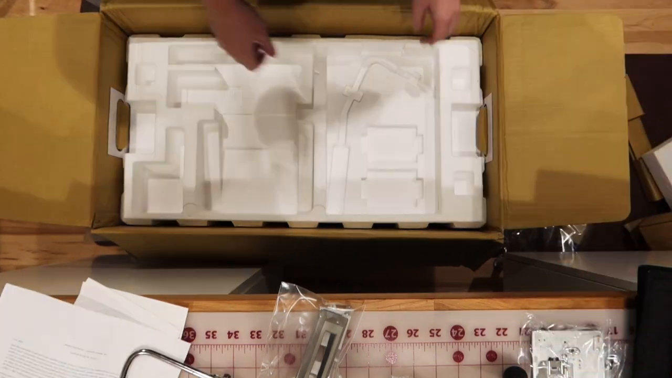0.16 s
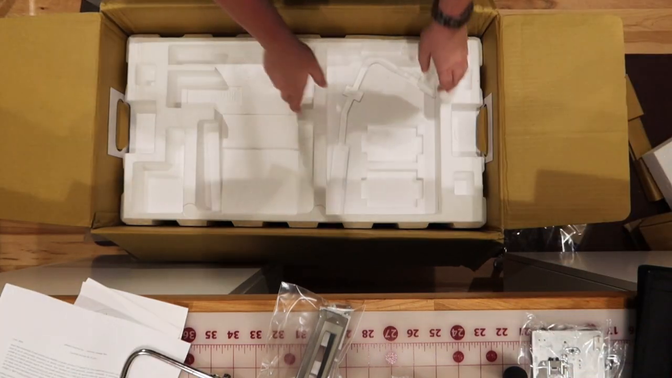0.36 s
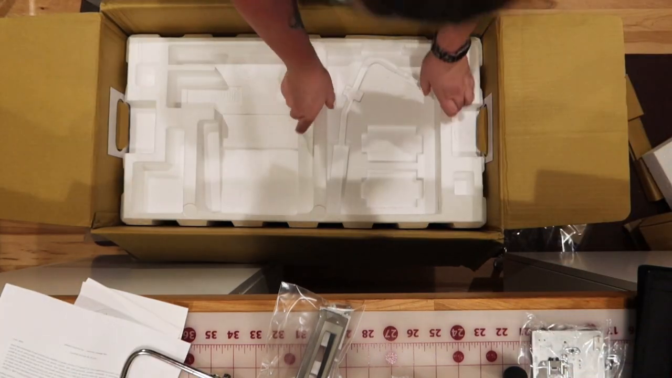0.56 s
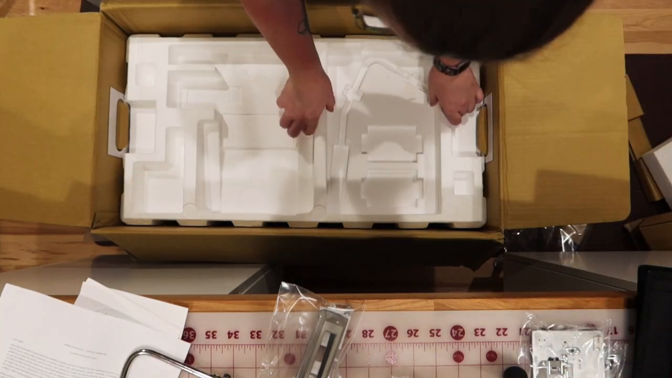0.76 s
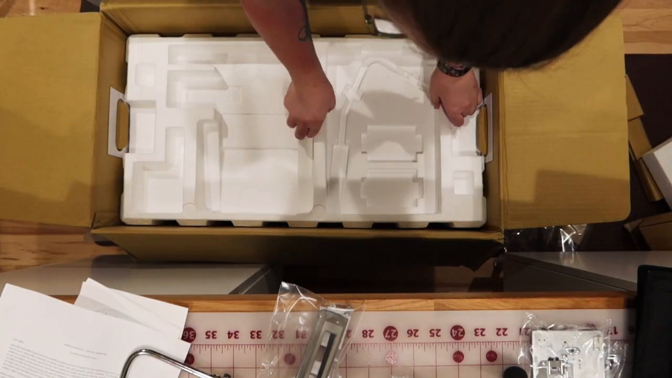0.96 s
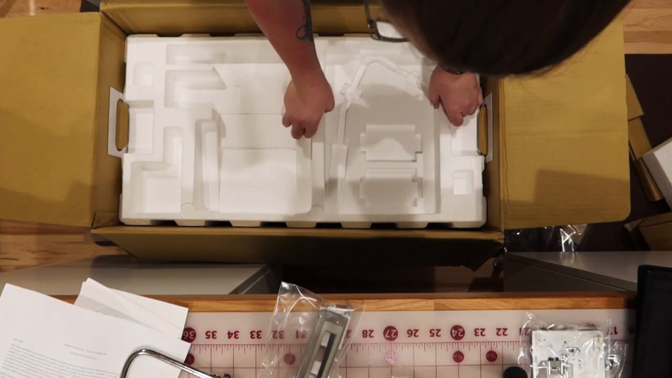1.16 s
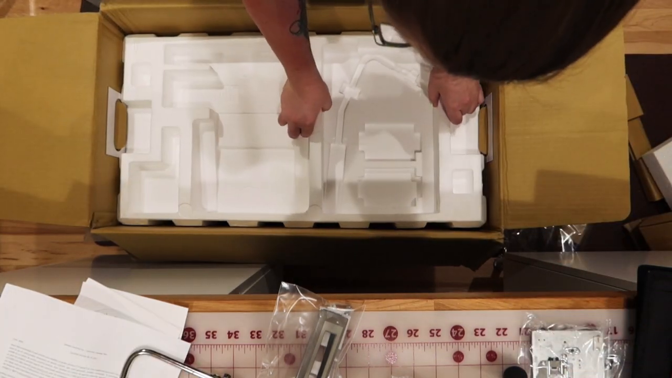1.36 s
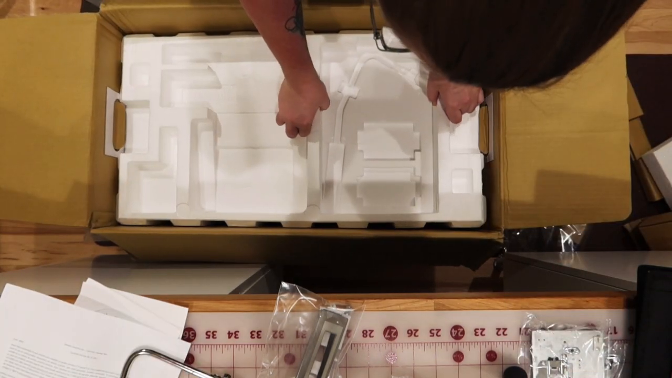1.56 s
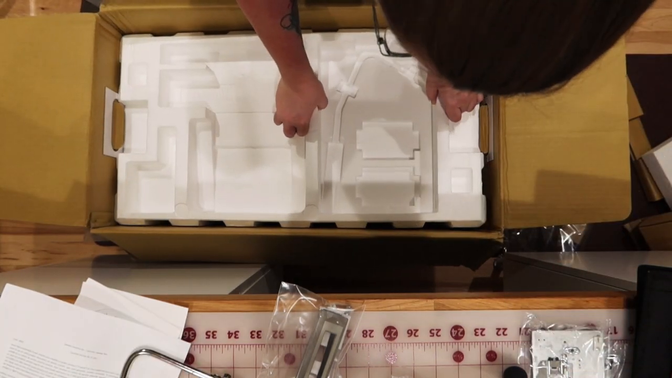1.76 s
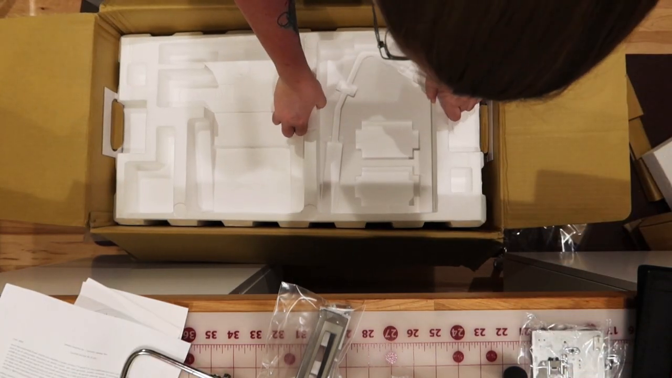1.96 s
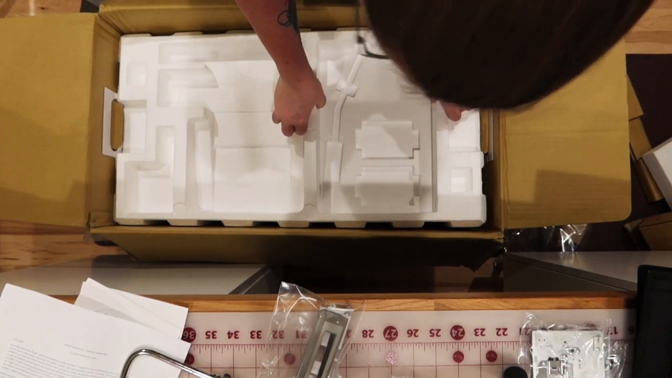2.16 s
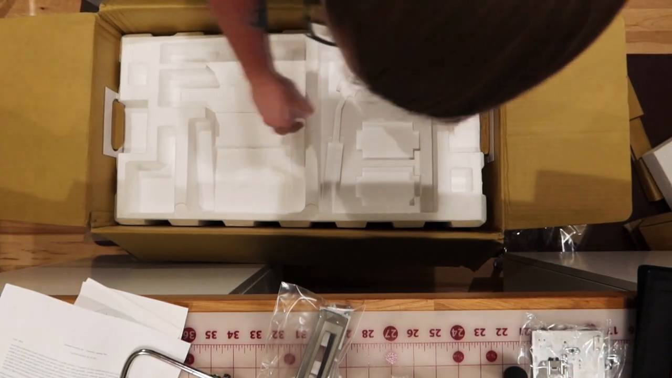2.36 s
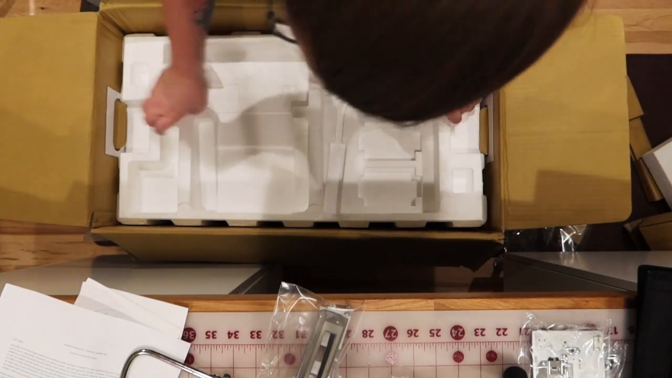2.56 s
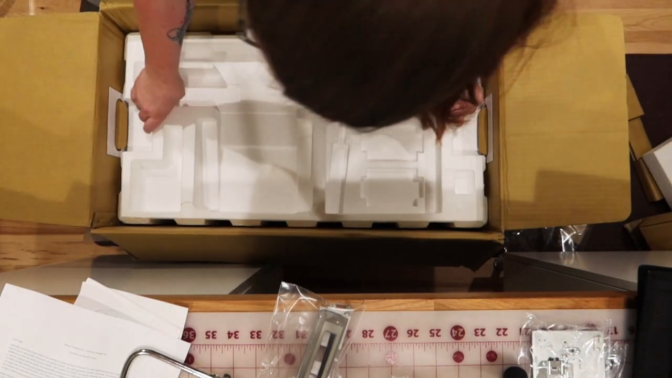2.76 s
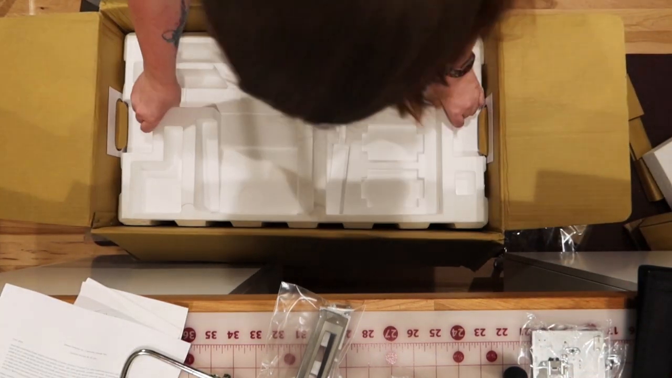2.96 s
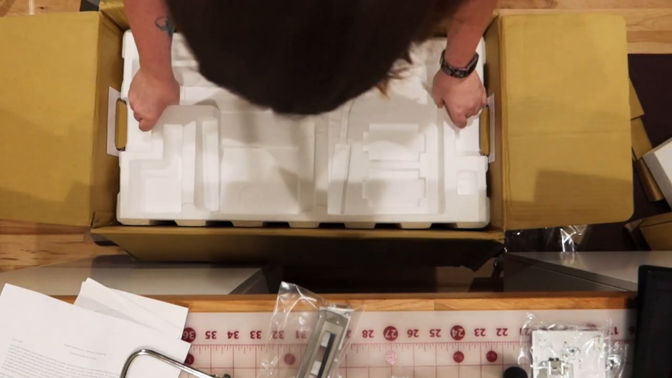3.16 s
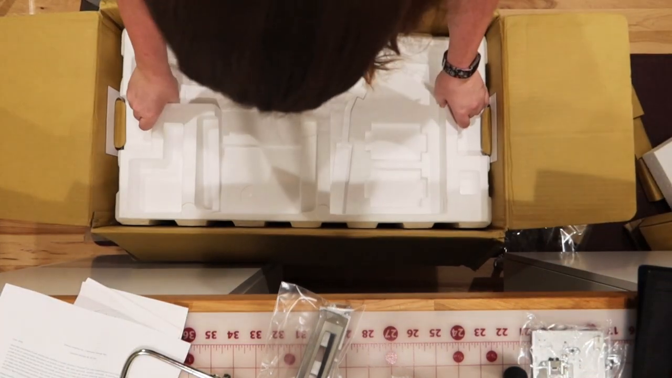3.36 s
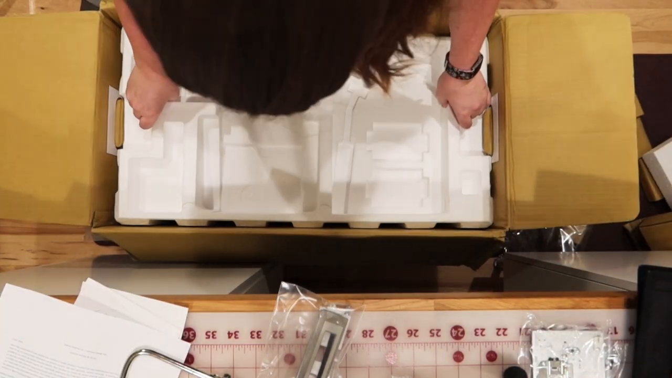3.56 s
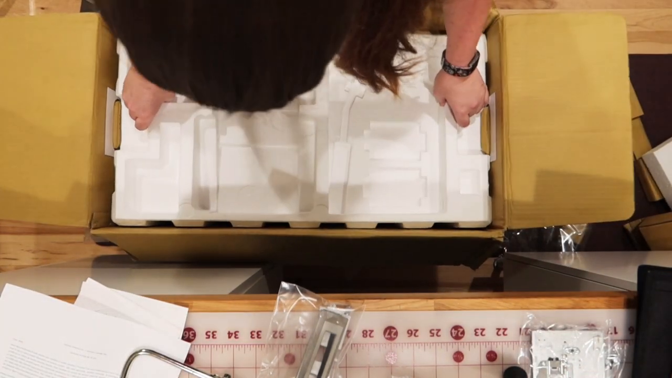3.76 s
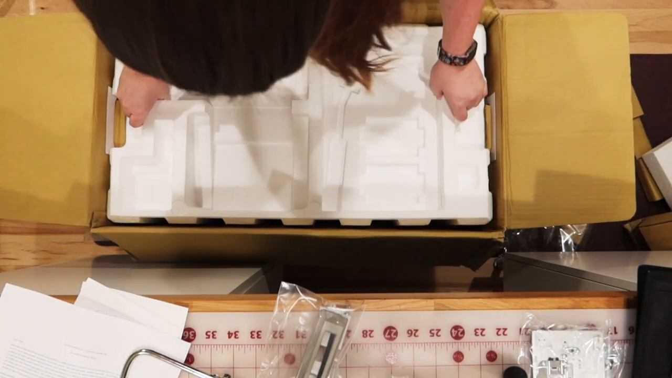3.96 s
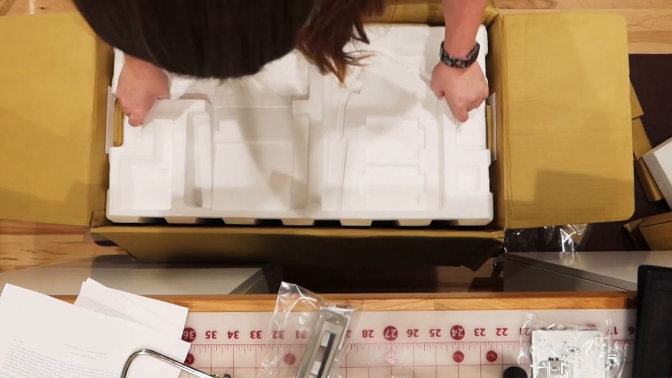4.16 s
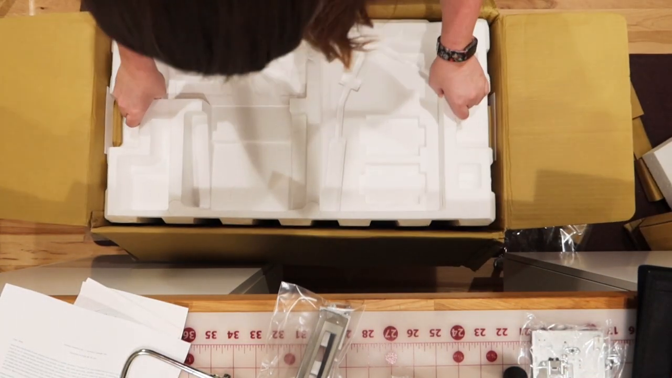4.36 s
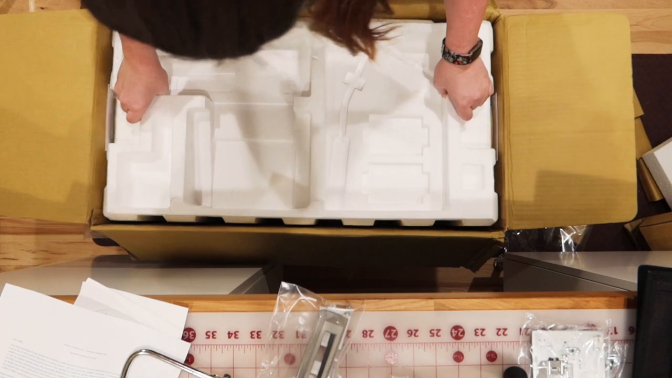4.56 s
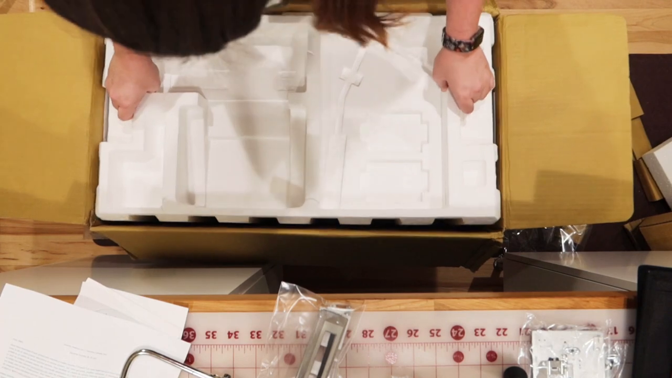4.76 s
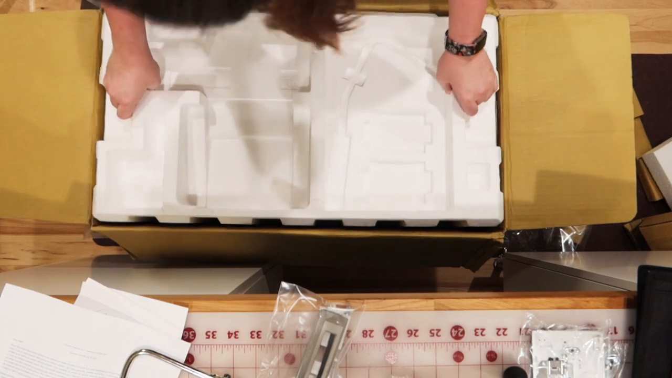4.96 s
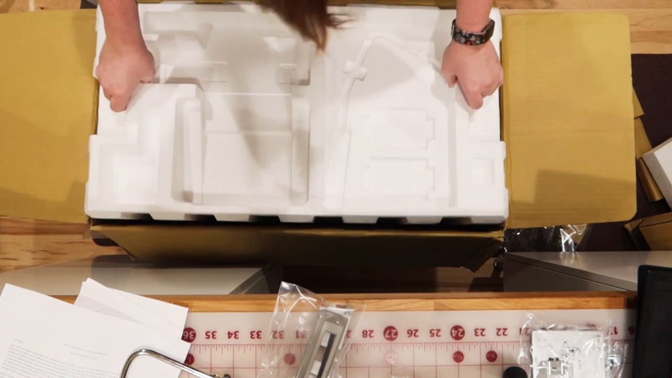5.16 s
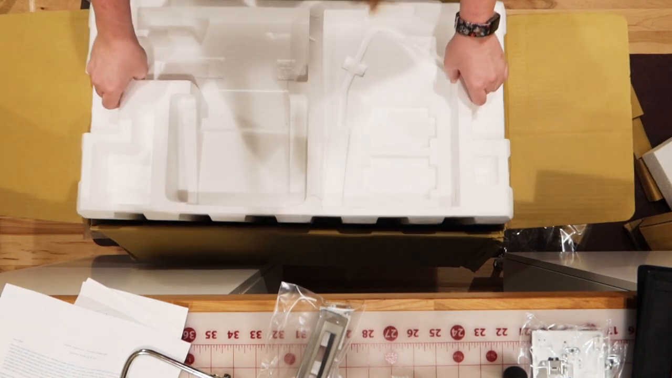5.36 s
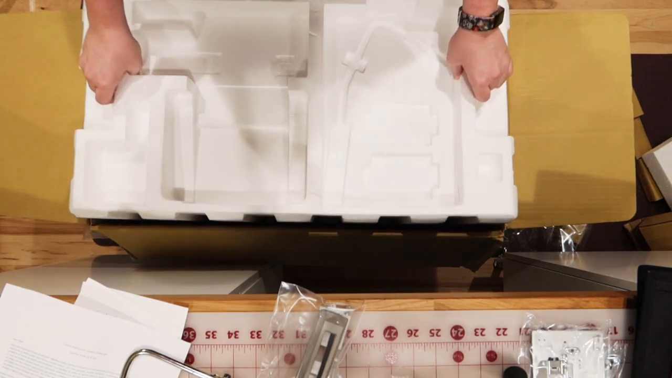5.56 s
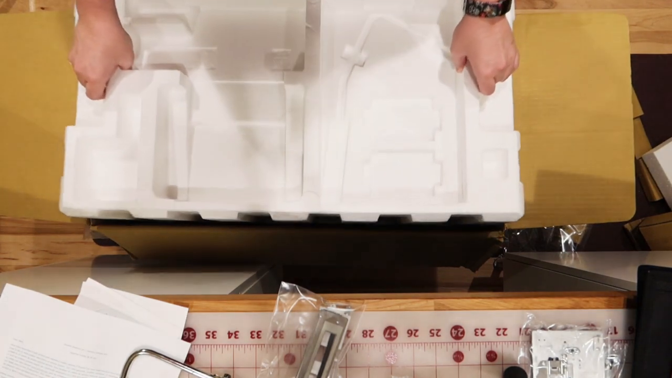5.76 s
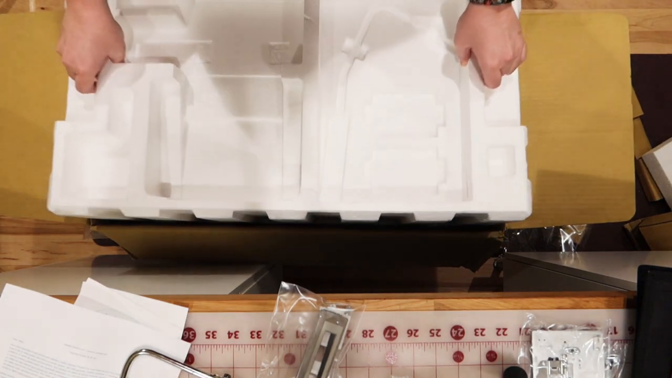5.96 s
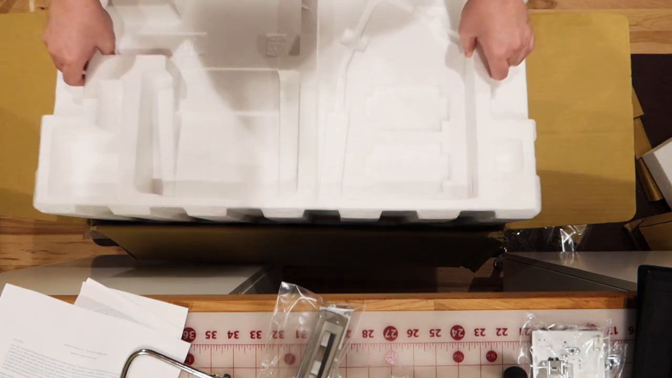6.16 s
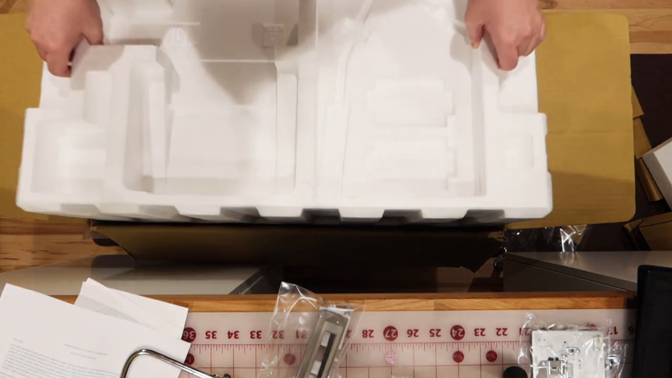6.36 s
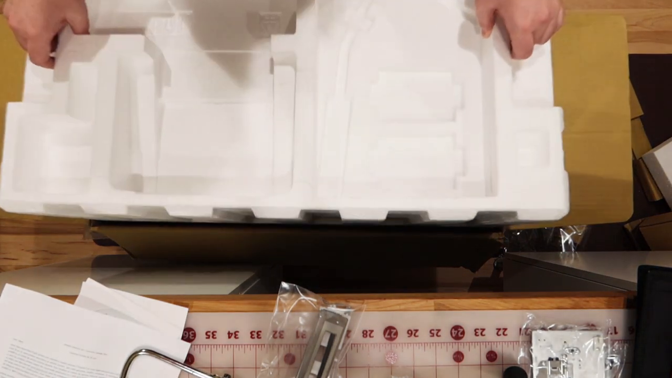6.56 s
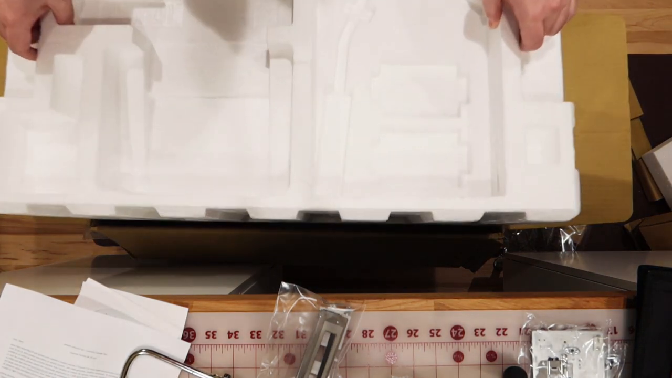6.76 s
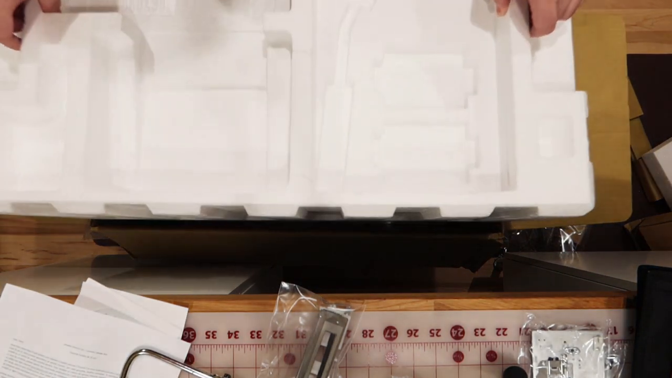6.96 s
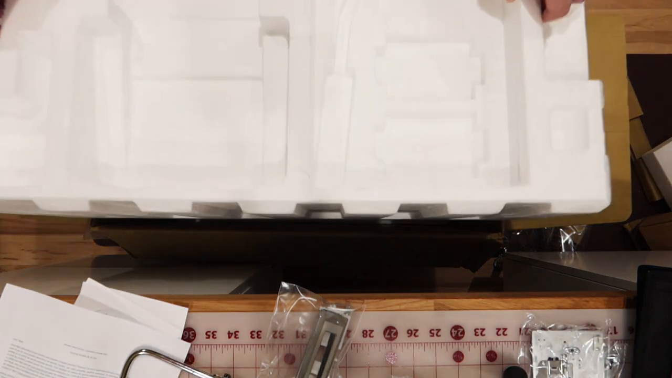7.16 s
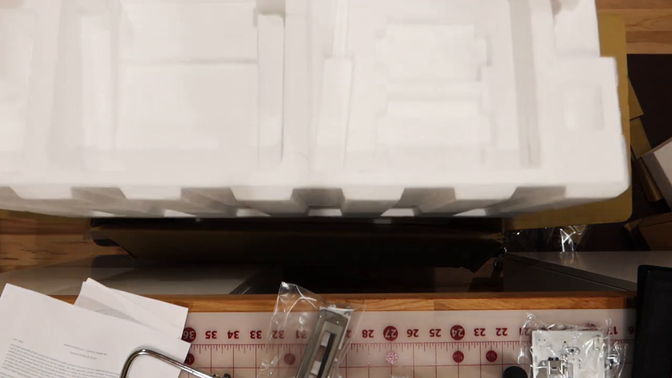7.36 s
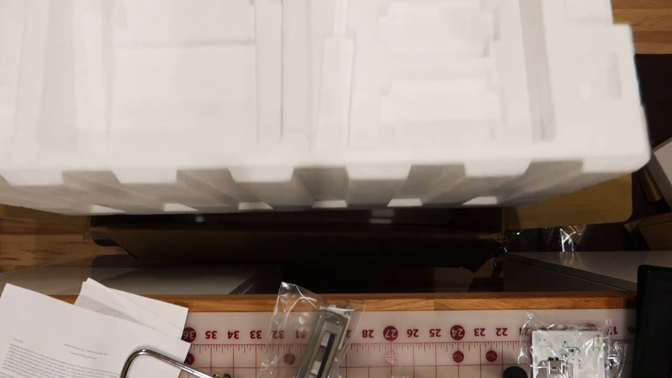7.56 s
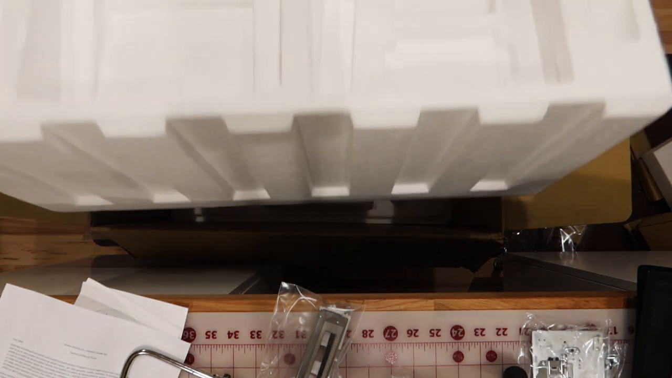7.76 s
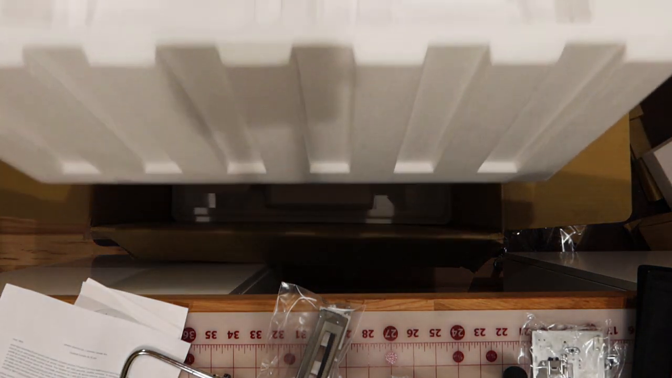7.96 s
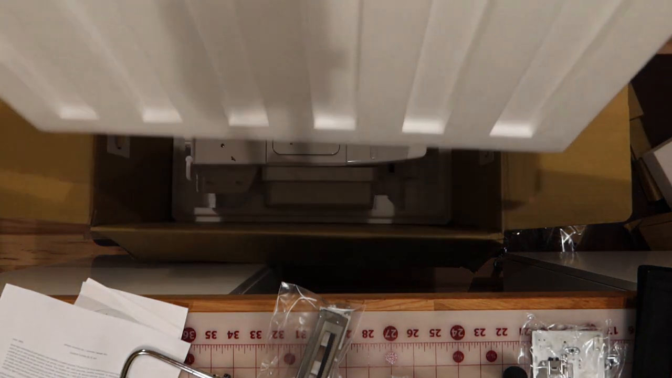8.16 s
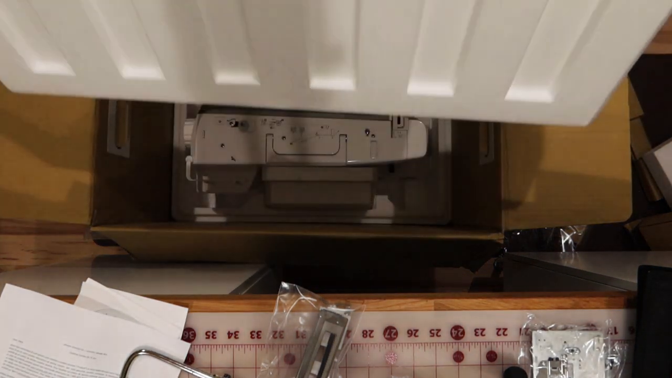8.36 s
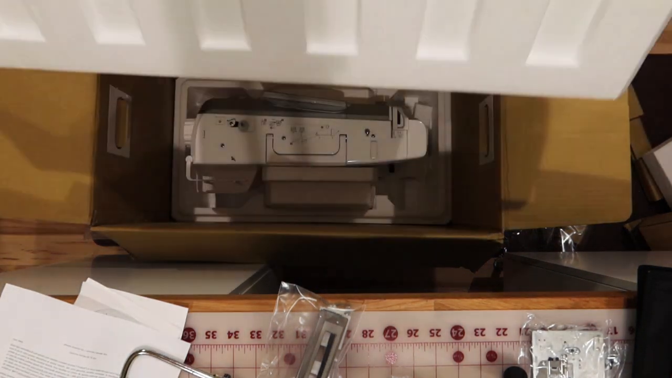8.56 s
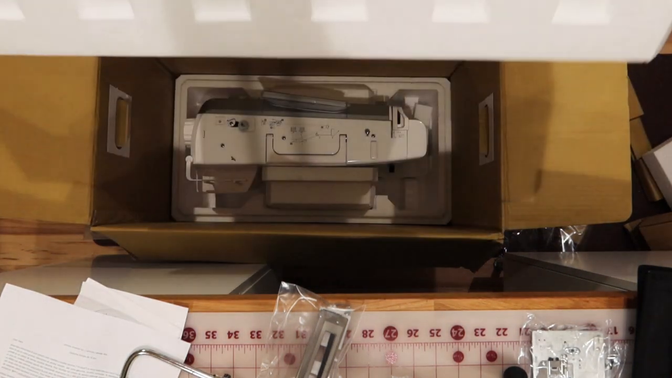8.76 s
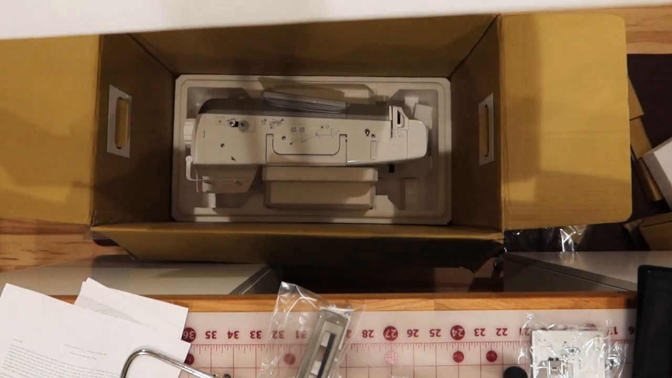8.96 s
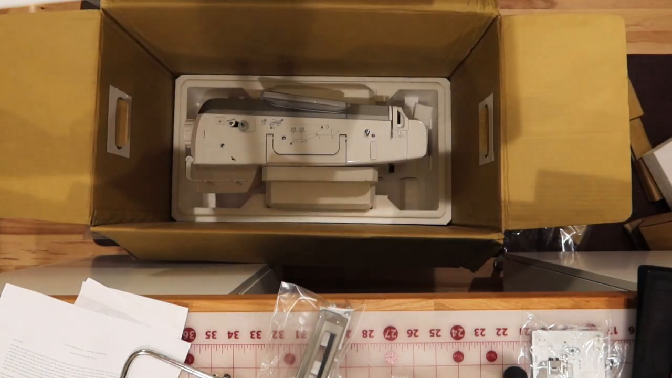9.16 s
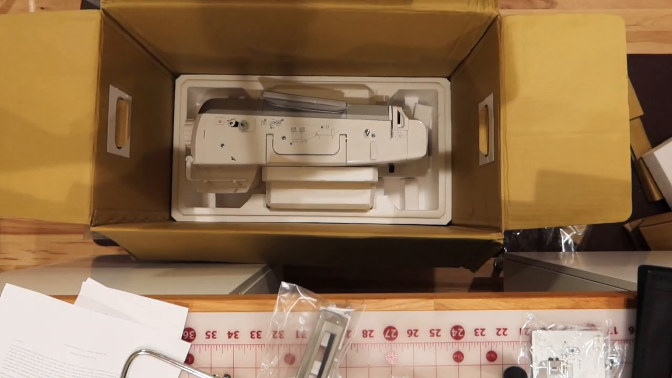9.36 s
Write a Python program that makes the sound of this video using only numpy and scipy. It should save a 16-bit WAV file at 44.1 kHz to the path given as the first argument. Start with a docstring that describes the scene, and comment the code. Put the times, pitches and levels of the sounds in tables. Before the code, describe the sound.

Foam packing is worked loose from a snug cardboard box indoors, heard close up. Soft knocks and gritty rubbing come first, then a sharp, loud slip with a hollow thump. Uneven scraping grows stronger over a low box rumble until it breaks free with two hard knocks. Short hollow foam groans, faint snaps and weak scuffs trail off.

```python
"""A wisp of foam hiss dies into a quiet room hum, which cuts out twice; then hands slide a moulded
foam insert up out of a tight cardboard box. Friction noise hisses along the walls, resonant box modes
drone under it and ring when knocked. The foam jerks free twice in loud stick-slip rasps, then creaks
and snaps as it is carried off; noise with frequency-dependent decay gives the room's answer."""
import sys
import numpy as np
from scipy import signal
from scipy.fft import rfft, irfft, next_fast_len
from scipy.io import wavfile
from scipy.ndimage import uniform_filter1d, map_coordinates

SR = 44100
rng = np.random.default_rng(int(sys.argv[2]) if len(sys.argv) > 2 else 0)


def nominal_scale(level):
    """Amplitude ratio for a level in decibels (scalar or array-like)."""
    x = np.asarray(level, float) / 20
    return 10 ** x


def transcribe(signal):
    """Save signal, clipped to [-1, 1], as a 16-bit WAV file at the path in sys.argv[1]."""
    frames = np.atleast_2d(signal).T
    limited = np.clip(frames, -1, 1)
    pcm = np.round(limited * 32767).astype(np.int16)
    wavfile.write(sys.argv[1], SR, pcm)


N = 414540

# spectrum of foam rubbing on cardboard: (frequency [Hz], relative density [dB per Hz])
RUB_SPECTRUM = [(180, -17.5), (300, -32.5), (354, -7), (611, -4), (893, -2.5), (1140, -1), (1910, -1.5),
                (3700, -7.5), (8060, -18), (13200, -29.5), (15600, -34.5)]


def unit(x):
    """Normalisation: scale to rms 1."""
    return x / np.sqrt(np.mean(x ** 2) + 1e-20)


def along(points, hz):
    """Logarithmic frequency scale: interpolate (frequency, value) points along it."""
    f, v = np.transpose(points)
    return np.interp(np.log(hz + 1), np.log(f + 1), v)


def filtered(x, response):
    """Linear filtering: multiply the spectrum of x by a complex response of frequency."""
    m = next_fast_len(x.shape[-1] + 8192)
    spectrum = rfft(x, m) * response(np.fft.rfftfreq(m, 1 / SR))
    return irfft(spectrum, m)[..., :x.shape[-1]]


def drifting(count, spacing):
    """Slow random modulation: smooth interpolation of random values spacing samples apart."""
    return map_coordinates(rng.standard_normal(count // spacing + 4), [np.arange(count) / spacing])


def patches(shape, count_hz, count_t):
    """Correlated randomness: a field of rms 1, smooth over some frequency bins and time frames."""
    field = uniform_filter1d(rng.standard_normal(shape), size=count_hz, axis=0)
    return unit(uniform_filter1d(field, size=count_t, axis=1))


def stereo(mid, side):
    """Spatial coherence: the two microphones agree best in the bass and differ in the treble."""
    # stereo width: (frequency [Hz], gain of the side signal [dB])
    width = [(60, -44), (200, -12.5), (500, -17), (1300, -21), (2400, -14), (4400, -8), (8000, -2),
             (15000, 6.5)]
    side = filtered(side, lambda hz: nominal_scale(along(width, hz)))
    return np.array([mid + side, mid - side])


def hum():
    """Stationary noise: steady room and microphone noise with a fixed spectrum."""
    # background spectrum: (frequency [Hz], relative density [dB per Hz])
    hum_spectrum = [(15, -57.5), (25, -2.5), (234, 5.5), (1280, -3), (3500, -9), (11300, -27.5),
                    (15600, -61)]
    noise = rng.standard_normal((2, N))
    coloured = filtered(noise, lambda hz: nominal_scale(along(hum_spectrum, hz)))
    return nominal_scale(-61.5) * stereo(*unit(coloured))


def room(x):
    """Reverberation: each frequency of the room's answer dies at its own speed."""
    # reverberation time: (frequency [Hz], time to fall 60 dB [s])
    decay = [(150, 0.32), (1500, 0.073), (10000, 0.0087)]
    hz, t, z = signal.stft(rng.standard_normal((2, SR // 2)), SR, nperseg=256)
    tail = signal.istft(z * nominal_scale(-60 * t / along(decay, hz)[:, None]), SR, nperseg=256)[1]
    delayed = np.pad(x, (500, 0))[None]  # padding in samples
    return signal.fftconvolve(delayed, tail / np.linalg.norm(tail[0]), axes=1)[:, :N]


def box(hz, favoured_hz=300, spread=12.0):
    """Modal resonance: walls and cavity ring, favouring modes near one pitch (spread in octaves)."""
    # modes of walls and cavity: (frequency [Hz], bandwidth [Hz], level before favouring [dB])
    modes = [(57.5, 30, -7), (98.5, 20.7, 1), (146.4, 24.6, 1), (200, 41, 0), (277, 79, -1.5),
             (366.7, 64.4, 1.5), (436.4, 46, -1), (502, 32, -4.5), (574, 55, -2.5), (780, 220, -7.5),
             (1120, 180, -6), (1750, 380, -27)]
    response = 0
    for k, (centre, width, db) in enumerate(modes):
        favour = 1 / (1 + (np.log2(centre / favoured_hz) / spread) ** 2)
        resonance = 1j * hz * width / (centre * centre - hz * hz + 1j * hz * width)
        response = response + (-1) ** k * nominal_scale(db) * favour * resonance  # neighbours alternate in sign
    return response


def snaps():
    """Impulsive excitation: beads snap in dry, bright ticks; in spells of crackle they come at chance."""
    # single beads snapping under the fingers: (time [s], peak level [dB])
    single = [(0.8688, -37), (2.2618, -37.5), (3.94, -27.5), (7.197, -41), (8.737, -51), (8.2846, -47.5),
              (8.308, -47), (8.339, -49), (8.45, -46), (8.928, -52)]
    # spells of fainter snapping as the grip shifts: (start [s], end [s], upper peak level [dB])
    spells = [(0.609, 0.697, -45), (1.212, 1.31, -36), (7.297, 7.344, -47), (8.224, 8.5, -55)]
    per_s, scatter_db = 120, 8
    ring_hz, width_hz, t60_s = 7400, 4900, 0.012
    out, t = np.zeros((2, N + SR)), np.arange(SR // 40) / SR
    chance = []
    for a, b, db in spells:
        for u, v in rng.random((60, 2))[:round((b - a) * per_s)]:
            chance.append((a + (b - a) * u, db + scatter_db * np.log(v + .01)))

    def ring(hz):
        return (hz * width_hz) ** 2 / ((ring_hz ** 2 - hz ** 2) ** 2 + (hz * width_hz) ** 2)

    noise = rng.standard_normal((len(single) + 200, 2, len(t)))
    ticks = filtered(noise * nominal_scale(-60 * t / t60_s), ring)
    for (s, db), tick in zip(single + chance, ticks):
        out[:, round(s * SR):][:, :len(t)] += nominal_scale(db) * tick / np.abs(tick[0]).max()
    return out[:, :N]


def creaks():
    """Flexural resonance: foam groans in low modes and a hollow note, stuttering, longer when louder."""
    # creaks in the hands: (time [s], groan peak [dB], pitch [Hz], scuff against groan peak [dB])
    creak_list = [(6.971, -31.5, 341, -5), (7.084, -34, 334, -1.5), (7.163, -36, 302, 4.5),
                  (7.19, -31, 340, -0.5), (7.304, -30, 358, -3), (7.428, -42, 328, 6),
                  (7.543, -30.5, 316, -6.5), (7.641, -31.5, 400, -2), (7.855, -30.5, 333, -2),
                  (7.975, -37.5, 336, 3), (8.408, -46, 346, -2), (8.436, -37.5, 338, 3.5),
                  (8.49, -48, 360, 6), (8.736, -49, 573, -4), (8.883, -43, 420, -4), (8.919, -45, 650, -12),
                  (9.293, -43.5, 341, -0.5)]
    rise_s, decay_s, width_hz = 0.0041, 0.035, 29  # the decay time holds for a groan at -36 dB
    out, t = np.zeros((2, N + SR)), np.arange(SR // 4) / SR
    for s, db, pitch_hz, scuff_db in creak_list:

        def body(hz):
            note = 1j * hz * width_hz / (pitch_hz ** 2 - hz ** 2 + 1j * hz * width_hz)
            return 0.5 * box(hz, pitch_hz, spread=1.2) + note

        def scuff_colour(hz):
            return nominal_scale(along(RUB_SPECTRUM, hz)) * (700 / (hz + 300)) ** 1.6

        noise = rng.standard_normal((2, 2, len(t)))
        swell = 1 - np.exp(-t / rise_s)
        dying = np.exp(-t / (decay_s * nominal_scale(0.36 * (db + 36.0))))
        flex = swell * dying * nominal_scale(2.5 * drifting(len(t), 300))
        groan = filtered(noise[0] * flex, body) * nominal_scale([[0], [-9]])  # mid, side
        scuff = filtered(noise[1] * flex, scuff_colour)
        groan = groan / np.abs(groan[0]).max()
        scuff = nominal_scale(scuff_db) * scuff / np.abs(scuff[0]).max()
        out[:, round(s * SR):][:, :len(t)] += nominal_scale(db) * (groan + scuff)
    return out[:, :N]


def knocks():
    """Forced vibration: a push and a rough contact ring the box; surfaces scuff while they touch."""
    # blows and scuffs on the box: (time [s], thud peak [dB], favoured pitch [Hz],
    # scuff against thud peak [dB], contact time [s])
    blows = [(0.526, -25.5, 109, -30, 0.014), (0.641, -26, 160, -7.5, 0.0043),
             (0.806, -26.5, 145, -33, 0.024), (0.984, -34.5, 132, -25, 0.016),
             (1.153, -33.5, 351, 0, 0.072), (1.381, -37, 254, 5.5, 0.055), (2.259, -19, 200, -8, 0.018),
             (2.301, -21.5, 200, -5.5, 0.02), (2.778, -24.5, 89, -27, 0.019), (2.82, -29, 85.5, -24, 0.025),
             (2.941, -23, 212, -11, 0.031), (3.302, -35, 378, -11.5, 0.033), (3.404, -30, 361, -7, 0.073),
             (3.673, -22, 113.5, -5.5, 0.055), (3.731, -19, 312, -12.5, 0.012),
             (3.768, -17.5, 99, -14.5, 0.03), (3.9406, -5, 406, -14, 0.03), (3.993, -19, 392, -19.5, 0.018),
             (4.667, -26, 102, 0.5, 0.03), (4.886, -27.5, 117, -6.5, 0.023), (5.655, -29.5, 394, 7, 0.02),
             (6.614, 2, 355, -23.5, 0.023), (6.675, -20, 296, -9, 0.036), (6.727, -2, 336, -8.5, 0.015),
             (6.766, -23, 330, 2, 0.035), (6.798, -15.5, 360, -3, 0.0073)]

    def scuff_colour(hz):
        return nominal_scale(along(RUB_SPECTRUM, hz)) * (700 / (hz + 300)) ** 1.2

    out, t = np.zeros((2, N + SR)), np.arange(SR // 4) / SR
    for s, db, favoured_hz, scuff_db, contact in blows:
        noise = rng.standard_normal((2, 2, len(t)))
        contact = max(contact, .002)
        rising = 1 - np.exp(-t / (0.0025 * contact * nominal_scale(-.7 * db)))  # light, long contacts build gently
        push = 4 * np.exp(-contact / 0.06) * t / 0.00051 * np.exp(-t / 0.00069) * [[1], [0]]
        beat = 2 * np.pi * favoured_hz * (t - 1.5 * t ** 2)  # the wall beats on the foam, slowing
        # every other beat lands harder
        flutter = 0.18 * np.sin(beat) * (1 + 1.24 * np.cos(beat / 2)) * [[1], [0]]
        force = (noise[0] - flutter) * rising * np.exp(-(t / contact) ** 4) - push
        thud = filtered(force, lambda hz: box(hz, favoured_hz, spread=1.1))
        # the big walls reach both microphones much alike: a weak side signal
        thud = thud / np.abs(thud[0]).max() * nominal_scale([[0], [-13.]])
        fading = (1 - np.exp(-t / 0.00063)) * np.exp(-t / (1.17 * contact))
        scuff = filtered(noise[1] * fading, scuff_colour)
        scuff = nominal_scale(scuff_db) * scuff / np.abs(scuff[0]).max()
        out[:, round(s * SR):][:, :len(t)] += nominal_scale(db) * (thud + scuff)
    return out[:, :N]


def slips():
    """Stick-slip release: the foam lets go of the wall in a short bright rasp with a broad squeal."""
    # sudden slips: (time [s], level before a 19 dB cut [dB], time to fall 60 dB [s], squeal [Hz])
    slip_list = [(0.762, -21, 0.13, 2500), (0.862, -23.5, 0.067, 2730), (1.2804, -30, 0.086, 1940),
                 (2.781, -19.5, 0.046, 2950), (3.7182, 3, 0.044, 2270), (3.7604, 12, 0.013, 4130),
                 (3.8675, -12.5, 0.059, 2920), (6.61, 0.5, 0.025, 4260), (6.729, 0, 0.029, 4020),
                 (6.899, -26, 0.13, 3900), (6.999, -22, 0.085, 1890), (7.296, -32, 0.073, 1650),
                 (8.626, -41.5, 0.15, 1113)]
    out, t = np.zeros((2, N + SR)), np.arange(SR // 4) / SR
    for s, db, t60, squeal_hz in slip_list:

        def colour(hz):
            squeal = 1 + 2.1 / (1 + ((hz - squeal_hz) / (0.2 * squeal_hz)) ** 2)
            bass_cut = hz ** 2 / (hz ** 2 + 1800 ** 2)
            return nominal_scale(along(RUB_SPECTRUM, hz)) * squeal * bass_cut

        grit = rng.standard_normal((2, len(t))) * nominal_scale(1.9 * drifting(len(t), 150))
        rasp = unit(filtered(grit, colour))
        envelope = nominal_scale(db - 19.0 - 60 * (t / t60) ** 2) * (1 - np.exp(-t / 0.0015))
        out[:, round(s * SR):][:, :len(t)] += envelope * rasp
    return out[:, :N]


def stroking():
    """Friction control: rub level and brightness in time follow the strongest stroke of the moment."""
    # strokes of foam along the walls: (start [s], end [s], rub at start [dB], rub at end [dB],
    # treble against rub [dB])
    strokes = [(0, 0.036, -50.5, -66, -20), (0.582, 0.89, -49, -50, -8.5), (1.032, 2.095, -45, -43, -11),
               (2.347, 2.815, -42, -41.5, -8.5), (3.013, 3.344, -51, -43, -10),
               (3.372, 3.69, -42.5, -39, -9), (3.727, 3.762, -21, -24, -9), (3.858, 3.923, -31, -32, -7.5),
               (3.976, 4.156, -39, -44.5, -8), (4.276, 4.377, -36, -34.5, -4.5),
               (4.43, 4.553, -42, -41.5, -13), (4.656, 4.908, -32.5, -38, -4.5),
               (4.998, 5.26, -38, -36, -5.5), (5.267, 5.637, -34.5, -36.5, -6),
               (5.656, 6.617, -34.5, -32, -6), (6.635, 6.7, -54.5, -41, -15),
               (6.711, 6.906, -36, -43, -6.5), (6.903, 7.037, -50, -51, -5.5),
               (7.623, 7.83, -58.5, -56, -14), (7.847, 7.9, -51, -52.5, -10),
               (7.963, 8.2, -56.5, -52.5, -5.5), (8.2, 8.473, -51, -55, -16),
               (8.749, 8.857, -46.5, -60, -13.5), (8.889, 9.14, -54.5, -73, -10.5)]
    rise_db_per_s, fade_db_per_s, rest_db = 545, 113, -89.5  # grips fast, eases off slowly
    free_s, let_go_db_per_s = 6.62, 1800  # the insert jumps clear of the walls and the rub stops dead
    t = np.arange(0, N / SR + .05, .002)
    start, stop, first_db, last_db, treble_db = np.transpose(strokes)[:, :, None]
    let_go = np.where((stop <= free_s) & (t > free_s), let_go_db_per_s * (t - free_s), 0)
    fade = let_go + fade_db_per_s * np.maximum(t - stop, 0)
    progress = np.clip((t - start) / np.maximum(stop - start, .005), 0, 1)
    held = first_db + (last_db - first_db) * progress
    level_db = held - fade - rise_db_per_s * np.maximum(start - t, 0)
    strongest_treble_db = treble_db[level_db.argmax(axis=0), 0]
    return t, np.maximum(level_db.max(axis=0), rest_db), uniform_filter1d(strongest_treble_db, size=25)


def drone():
    """Structure-borne sound: dragging foam shakes the box walls in lumps, louder for a harder rub."""
    s, rub_db, _ = stroking()
    lag_s = 0.11
    smooth_db = uniform_filter1d(rub_db, size=round(lag_s / s[1]))
    drone_db = -48.5 + 0.45 * (smooth_db + 43.5)  # 0.45 dB per dB of rub
    lumps = nominal_scale(3.6 * drifting(N, 1000))
    walls = filtered(lumps * rng.standard_normal((2, N)), box)
    return stereo(*nominal_scale(np.interp(np.arange(N) / SR, s, drone_db)) * unit(walls))


def rub():
    """Friction noise: pressure brightens bead contacts, patches catch, many small modes drift."""
    beads = rng.standard_normal((2, N)) * nominal_scale(1.55 * rng.standard_normal(N))  # contacts of uneven size
    hz, t, z = signal.stft(beads, SR, nperseg=1024)
    fine_db = 3.4 * patches(z.shape[1:], count_hz=1, count_t=12)
    broad_db = 1.24 * patches(z.shape[1:], count_hz=10, count_t=3)
    s, rub_db, treble_db = stroking()
    treble_db = np.interp(t, s, treble_db)
    slope = np.clip(np.log2((hz + 1) / 2200) / 1.94, -.3, 1.6)[:, None]
    tilt_db = slope * (treble_db + 7.5)
    gain = nominal_scale(along(RUB_SPECTRUM, hz)[:, None] + tilt_db + fine_db + broad_db)
    # hold the level of the middle band steady
    middle = ((hz > 900) & (hz < 3500))[:, None]
    gain = gain / np.sqrt(np.mean(gain ** 2 * middle, axis=0))
    pair = signal.istft(z * gain, SR, nperseg=1024)[1][:, :N]
    stutter_db = 1.55 * drifting(N, 600)  # grip comes and goes
    return stereo(*pair * nominal_scale(np.interp(np.arange(N) / SR, s, rub_db) + stutter_db))


def scene():
    """Superposition: box, foam and room add together; the short events also excite the room."""
    hits = knocks() + creaks() + slips() + snaps()
    with_room = hits + nominal_scale(-17.5) * room(hits[0])
    return stereo(*with_room) + rub() + drone() + hum()


def band_limit(x):
    """A steep low-pass at the top of the band."""
    return signal.sosfilt(signal.butter(12, 15760, fs=SR, output="sos"), x)


def record(dry):
    """Soft saturation: peaks squash at full scale, and the sound drops out twice."""
    # silences: (start [s], end [s])
    dropouts = [(0.229, .249), (0.269, .289)]
    mix = dry / (1 + np.abs(dry) ** 6) ** (1 / 6)
    t = np.arange(N) / SR
    for start, stop in dropouts:
        is_open = 1.0 * ((t < start) | (t > stop))
        mix = mix * uniform_filter1d(is_open, size=90)
    return band_limit(mix)


dry = scene()
out = record(dry)
transcribe(out)
```